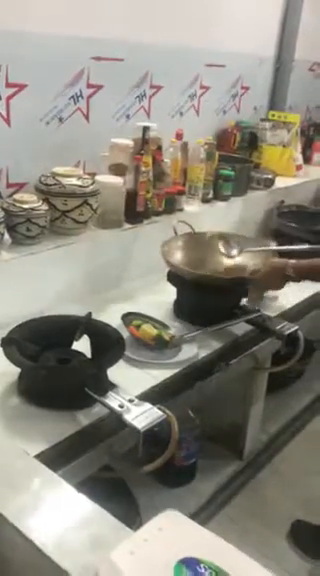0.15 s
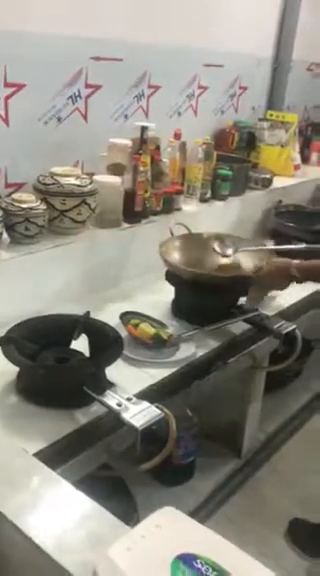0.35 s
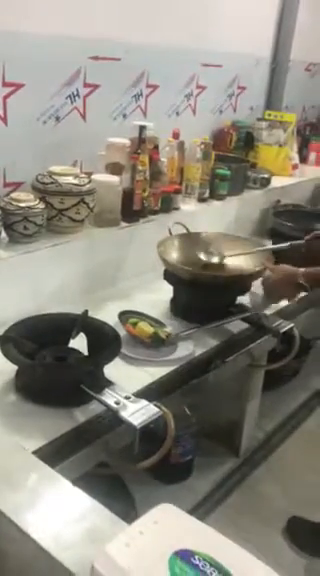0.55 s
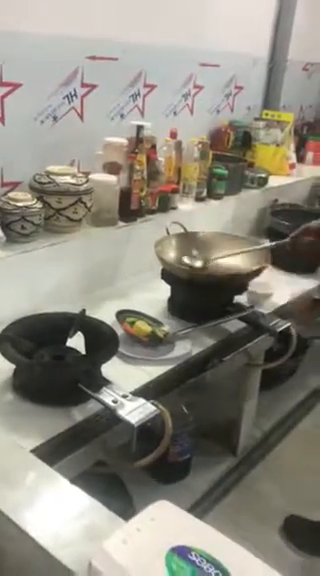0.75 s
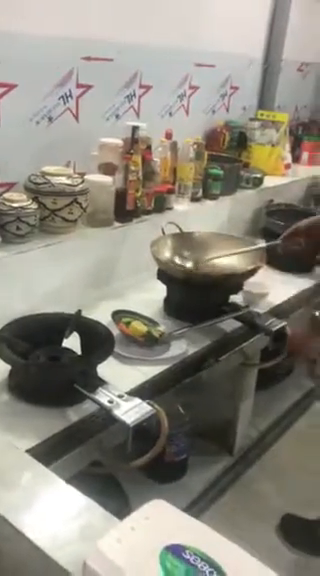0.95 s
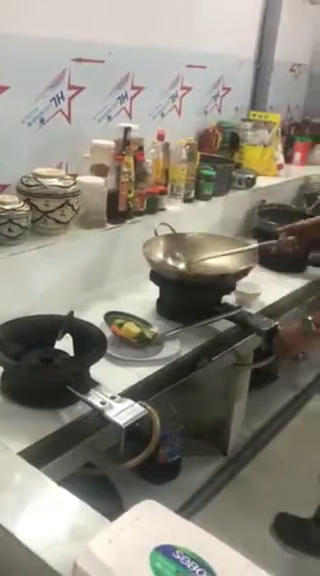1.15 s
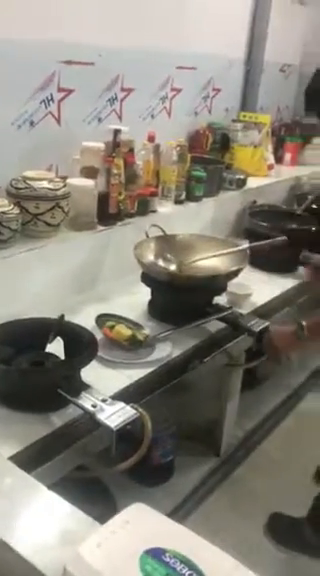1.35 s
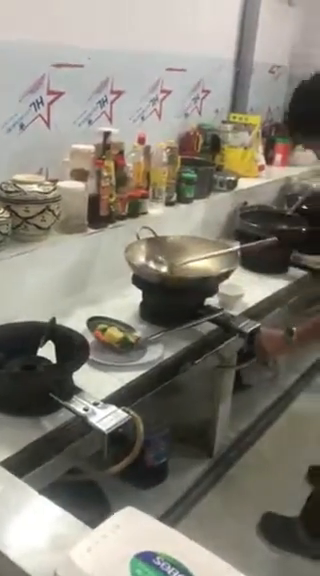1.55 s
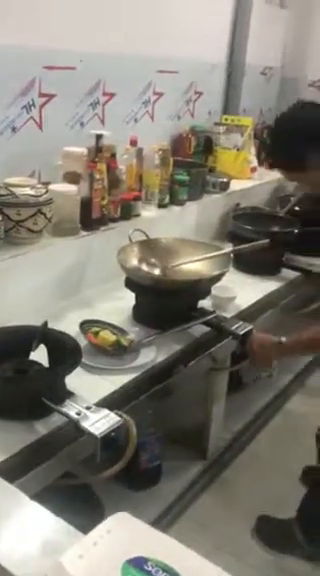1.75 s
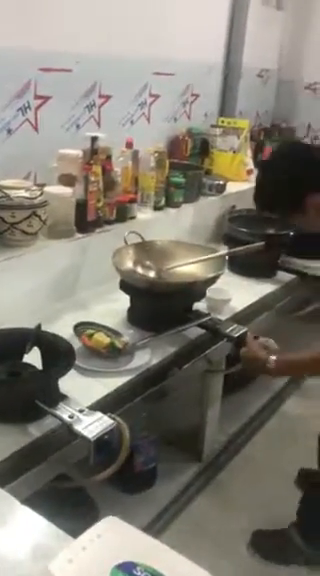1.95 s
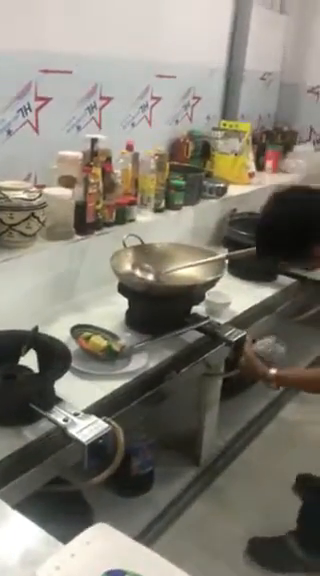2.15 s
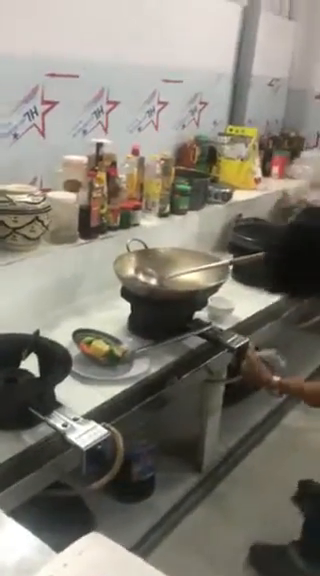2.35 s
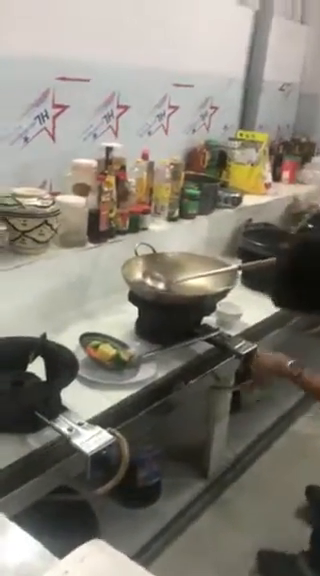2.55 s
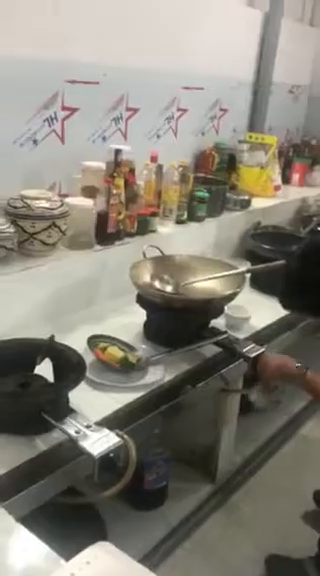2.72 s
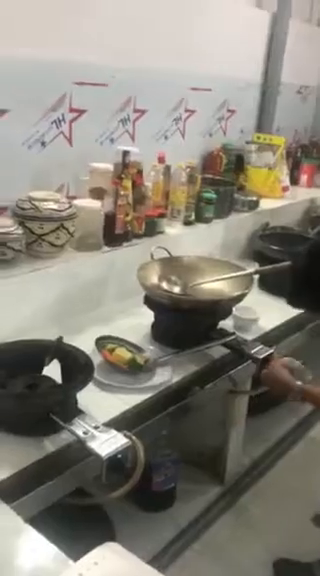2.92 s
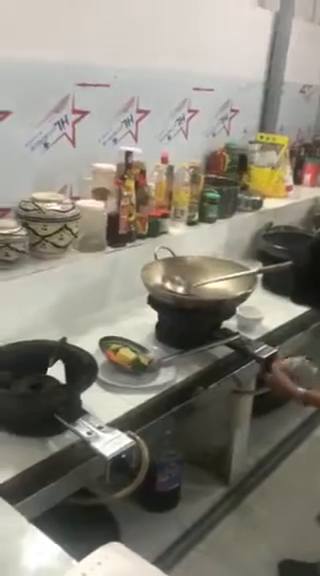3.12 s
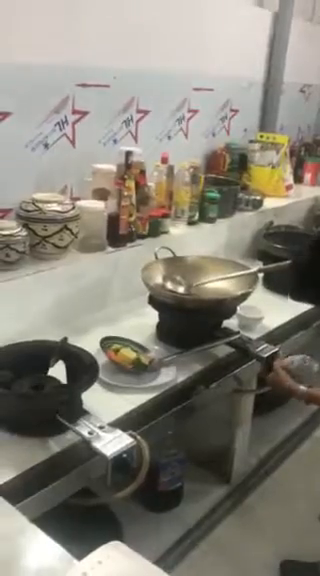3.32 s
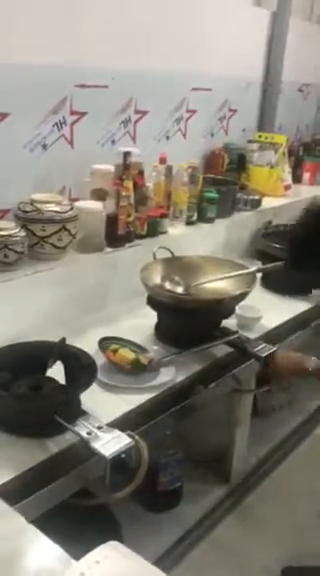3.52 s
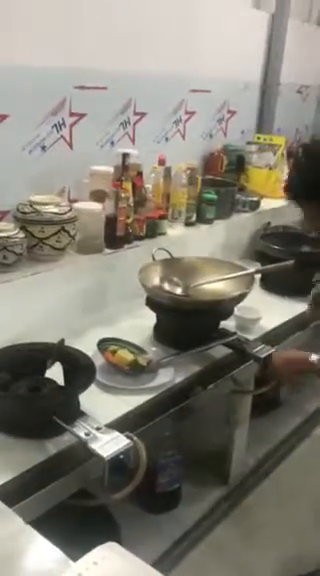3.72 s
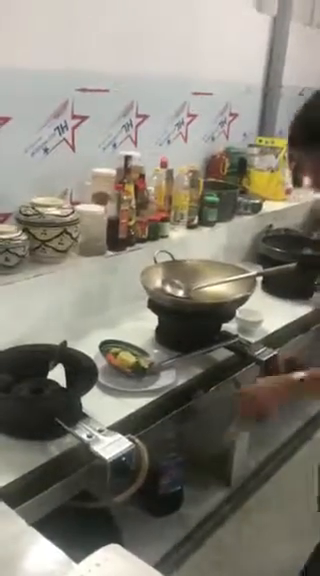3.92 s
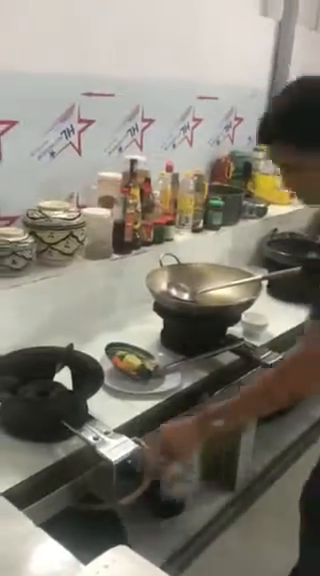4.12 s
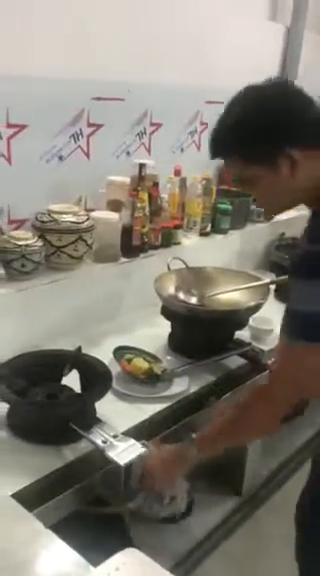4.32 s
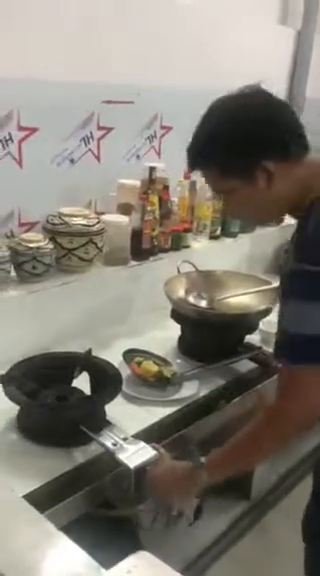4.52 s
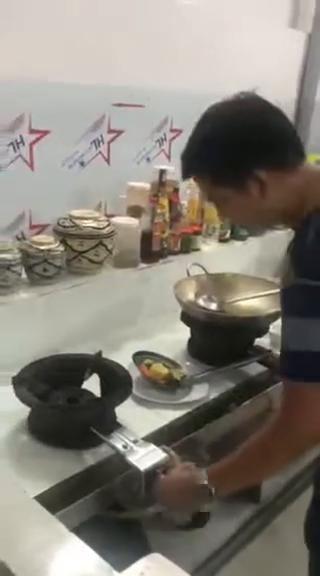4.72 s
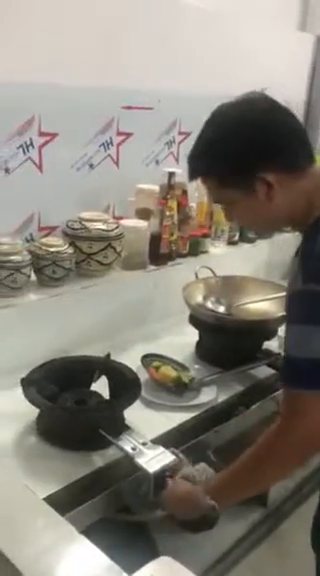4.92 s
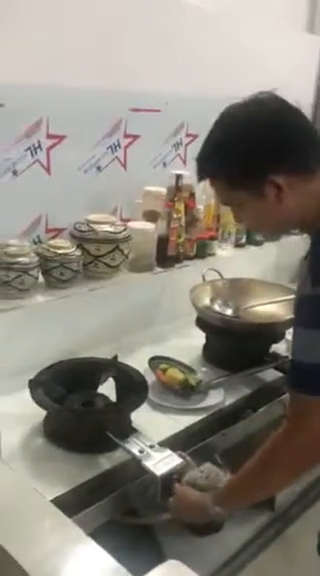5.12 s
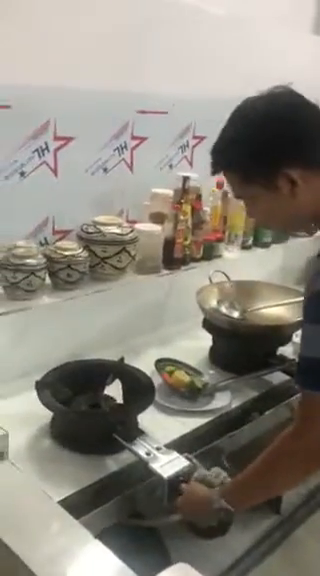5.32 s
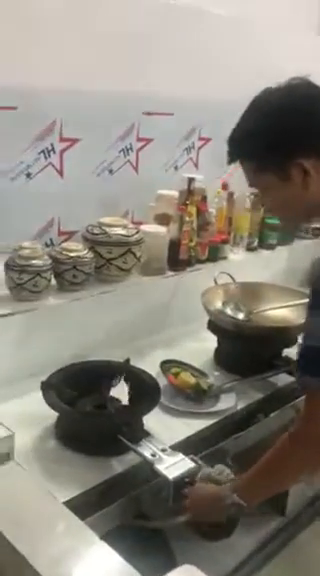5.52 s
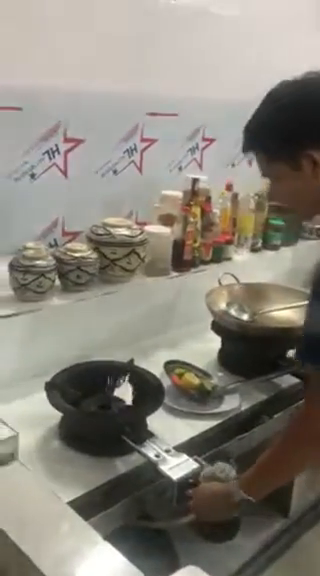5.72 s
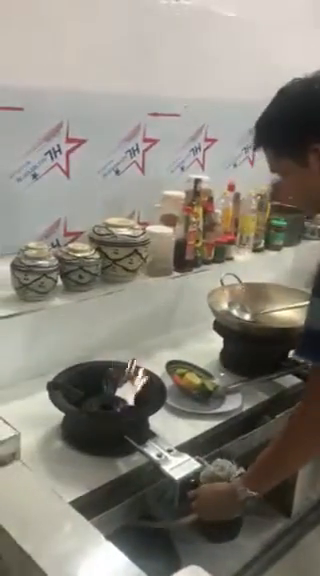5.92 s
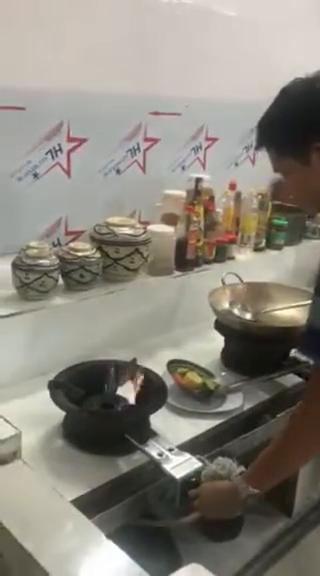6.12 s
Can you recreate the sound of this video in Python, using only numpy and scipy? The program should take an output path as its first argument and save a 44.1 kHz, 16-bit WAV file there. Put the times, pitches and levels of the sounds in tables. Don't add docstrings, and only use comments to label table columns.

```python
import sys
import numpy as np
from scipy import signal
from scipy.fft import rfft, irfft
from scipy.io import wavfile
from scipy.ndimage import uniform_filter1d

SR = 44100
rng = np.random.default_rng(int(sys.argv[2]) if len(sys.argv) > 2 else 0)


def transcribe(signal):
    frames = np.atleast_2d(signal).T
    limited = np.clip(frames, -1, 1)
    pcm = np.round(limited * 32767).astype(np.int16)
    wavfile.write(sys.argv[1], SR, pcm)


def decibels_to_gain(level_db):
    exponent = np.asarray(level_db, float) / 20
    return 10 ** exponent


N = 271656

# f/Hz, level per Hz/dB
FAN_AIR = [(18, -33.5), (30, -1.5), (101, -4), (167, -7.5), (245, -5.5), (376, -14), (404, -16),
           (445, -15.5), (501, -16.5), (1300, -19), (1470, -21.5), (9000, -23.5), (11700, -53),
           (19800, -120)]
# f/Hz, width/Hz, level/dB
MOTOR_HUM = [(49, 5.2, -59.5), (99, 16, -60), (312, 21.4, -63)]

# f/Hz, level/dB, t60/s (time to fade by 60 dB)
WOK_TONES = [(390, -6, 0.48), (460, -10, 0.4), (546, -9, 0.28), (643, -8, 0.21), (767, -18, 0.51),
             (1602, -11, 0.18), (1774, 0, 0.15), (1943, -11, 0.24), (2051, -21, 0.55), (2116, -11, 0.33),
             (2449, -22, 0.44), (2627, -21, 0.55), (2885, -20, 0.45), (3066, -11, 0.25), (3168, -19, 0.29),
             (3529, -12, 0.15), (3682, -8, 0.35), (3844, -17, 0.21), (3970, -14, 0.16), (4253, -21, 0.32),
             (4582, -14, 0.25), (5297, -23, 0.27), (5491, -21, 0.19), (5693, -30, 0.55), (5905, -21, 0.25),
             (6565, -26, 0.29), (7757, -22, 0.15), (8425, -25, 0.2), (8619, -24, 0.19), (8923, -27, 0.23)]
LADLE_TONES = [(848, -18, 0.4), (1109, -7, 0.32), (1252, 0, 0.17), (1591, -11, 0.31), (2164, -12, 0.36),
               (2662, -20, 0.4), (2894, -13, 0.32), (3050, -12, 0.4), (3370, -2, 0.2), (3467, -14, 0.36),
               (3709, -9, 0.24), (4116, -8, 0.21), (4204, -13, 0.33), (4533, -19, 0.4), (4788, -15, 0.3),
               (5286, -15, 0.28), (7938, -13, 0.17), (8966, -24, 0.39)]
BASE_TONES = [(390, 0, 0.36), (600, -9, 0.3), (939, -19, 0.45), (1209, -16, 0.45), (1346, -1, 0.15),
              (2113, -12, 0.2), (2885, -23, 0.45), (3634, -17, 0.25), (4366, -24, 0.42), (5556, -24, 0.36),
              (6498, -24, 0.38), (6837, -23, 0.26)]
FAR_TONES = [(388, -10, 0.33), (1314, -10, 0.21), (1631, -13, 0.4), (1914, -11, 0.22), (2667, -7, 0.27),
             (2950, -5, 0.35), (3033, 0, 0.31), (3092, -6, 0.4), (3222, -11, 0.43), (3410, -4, 0.26),
             (3502, -6, 0.32), (3784, -3, 0.33), (4581, -9, 0.3), (5036, -11, 0.29), (5364, -12, 0.24),
             (5472, -13, 0.38), (5582, -9, 0.24), (5744, -11, 0.21), (6188, -10, 0.26), (6492, -10, 0.23),
             (6823, -12, 0.28), (7267, -14, 0.18), (7701, -6, 0.19), (8000, -14, 0.44), (8175, -8, 0.23),
             (8398, -4, 0.2), (8481, -7, 0.26), (8788, 0, 0.18), (8955, -15, 0.29), (9222, -15, 0.5)]
KNOB_TONES = [(1319, -18, 0.3), (3402, -15, 0.3), (3782, -14, 0.3), (3914, 0, 0.16), (3984, -6, 0.21),
              (4218, -14, 0.28), (4592, -20, 0.3), (4996, -22, 0.3), (6218, -17, 0.3), (6514, -19, 0.3),
              (6737, -19, 0.3), (7036, -16, 0.3), (7943, -20, 0.3), (8409, -20, 0.3), (8576, -15, 0.25),
              (8694, -13, 0.3), (9041, -26, 0.3)]
NEAR_TONES = [(1222, -19, 0.24), (1378, -13, 0.18), (1572, -16, 0.23), (2826, -9, 0.31), (2966, -5, 0.24),
              (3060, -8, 0.45), (3101, -14, 0.3), (3187, -16, 0.45), (3464, -14, 0.35), (3997, -9, 0.17),
              (4083, -20, 0.44), (4196, -21, 0.45), (4312, -15, 0.25), (4385, -15, 0.22), (4762, -10, 0.21),
              (4869, -13, 0.21), (5157, -19, 0.38), (5515, -5, 0.15), (5994, -20, 0.41), (6317, -14, 0.24),
              (6425, -22, 0.38), (6683, -24, 0.36), (7249, -19, 0.23), (7965, -19, 0.25), (8371, -12, 0.23),
              (8759, -15, 0.38), (9079, -11, 0.23), (9238, -10, 0.15)]

# f/Hz, level per Hz/dB
WOK_CRACK = [(59, -35), (100, -9.5), (491, 2.5), (1380, -11.5), (2110, -2.5), (2370, -8.5), (3680, -0.5),
             (5100, -12.5), (5840, -9), (8570, -19.5), (9800, -42.5), (12700, -82), (21600, -120)]
LADLE_CRACK = [(180, -32), (300, -5), (950, -9), (1120, -2.5), (1430, -18.5), (2520, -11), (3010, -7.5),
               (8850, -17.5), (9800, -58), (12700, -89), (21600, -120)]
BASE_CRACK = [(59, -30), (100, -7), (383, 1), (809, -11.5), (1360, -13), (1920, -29.5), (2110, -19.5),
              (6300, -28), (8900, -40), (9800, -83.5), (12700, -110), (21600, -120)]
FAR_CRACK = [(120, -53), (200, -24), (1070, -21.5), (1610, -20), (2540, -23), (3030, 1), (4200, -8.5),
             (4630, -8), (4870, -8.5), (7190, -13.5), (8330, -6), (9800, -9.5), (12700, -36), (21600, -120)]
KNOB_CRACK = [(290, -51), (500, -25.5), (833, -23.5), (2150, -22), (3570, -4.5), (3900, -6.5), (5190, -7.5),
              (8870, -4), (9800, -30.5), (12700, -64), (21600, -120)]
NEAR_CRACK = [(120, -44), (200, -16), (939, -25.5), (1220, -17.5), (1390, -24), (1560, -6.5), (2420, -15.5),
              (3130, -1.5), (5540, -12.5), (8890, -3.5), (9800, -1), (12700, -39), (21600, -120)]

# f/Hz, level per Hz/dB
WOK_WASH = [(88, -49), (150, -23), (216, -21), (402, -1.5), (956, -23), (2050, -17.5), (3330, -18.5),
            (3760, -16), (4090, -23.5), (9400, -33.5), (12200, -60.5), (20700, -120)]
FAR_WASH = [(290, -42.5), (500, -15), (723, -15.5), (901, -36), (1620, -12.5), (1770, -31), (1880, -25.5),
            (3000, -5), (7350, -23), (9400, -8.5), (12200, -35), (20700, -120)]
NEAR_WASH = [(290, -59), (500, -32), (565, -10), (1030, -31.5), (1180, -12.5), (2180, -25.5), (2930, -1),
             (7540, -16), (8110, -11.5), (9400, -12.5), (12200, -38), (20700, -120)]

# t/s, peak level/dB, brightness/dB per octave, ring against crack/dB, crack t60/s, rattle/s
WOK_BLOWS = [
    (0.001, -32.5, 0.3, -7.5, 0.06, 0.015),
    (0.743, -8, 1.13, -6, 0.091, 0.01),
]
LADLE_BLOWS = [
    (0.164, -29, -0.3, -4, 0.1, 0.011),
    (0.189, -36, -0.3, -7, 0.13, 0.01),
    (0.539, -31.5, -0.33, -7.5, 0.077, 0.0079),
    (0.612, -37, -0.3, -6, 0.16, 0.011),
    (0.65, -34, -0.26, -7, 0.13, 0.016),
    (1.006, -29, -0.3, -1.5, 0.13, 0.0092),
    (1.034, -36, -0.3, -1, 0.1, 0.015),
    (1.219, -44.5, -0.3, -4, 0.085, 0.0079),
    (1.292, -44, -0.3, -4, 0.063, 0.012),
]
LADLE_SCRAPE = [
    (6.12, -26.5, 0.67, -8, 0.1, 0.05),
]
BASE_BLOWS = [
    (0.307, -21, 0.24, -4.5, 0.12, 0.0064),
    (0.328, -22.5, 0.43, -6, 0.1, 0.0047),
    (0.54, -36.5, 0.45, -8, 0.17, 0.006),
    (0.575, -27.5, 0.23, -11, 0.077, 0.0052),
    (0.599, -34, 0.3, -10, 0.12, 0.0052),
    (0.766, -19, 0.44, -1, 0.095, 0.0057),
]
FAR_SNAPS = [
    (2.1994, -8.5, 0.19, -6.5, 0.049, 0.014),
    (3.2853, -8.5, 0.077, -7.5, 0.074, 0.011),
]
KNOB_CLICKS = [(2.6385, -43, 0.13, -7, 0.043, 0.007), (2.6913, -21.5, 0.1, -8, 0.071, 0.0062),
               (2.967, -39, 0.14, -9.5, 0.06, 0.007), (2.9886, -40.5, 0.1, -9, 0.06, 0.0082),
               (3.5109, -35, 0.1, -8, 0.06, 0.005), (3.605, -38.5, 0.11, -7, 0.074, 0.008),
               (3.6317, -20, 0.11, -7, 0.054, 0.0061), (3.9421, -40.5, 0.1, -9, 0.067, 0.008),
               (4.5572, -42, 0.1, -7.5, 0.06, 0.007), (4.783, -47, 0.1, -8, 0.082, 0.0099),
               (4.807, -36.5, 0.1, -10, 0.055, 0.0049), (5.7614, -43, 0.1, -2.5, 0.067, 0.0059)]
NEAR_SNAPS = [
    (5.1405, -10.5, -0.12, -6, 0.059, 0.015),
]

# t/s, peak level/dB, f/Hz, t60/s
THUDS = [
    (1.4, -42.5, 121, 0.25),
    (1.906, -33, 259, 0.16),
    (1.918, -33, 167, 0.27),
    (1.988, -38.5, 307, 0.31),
    (2.038, -43.5, 310, 0.39),
    (2.214, -43.5, 375, 0.29),
    (3.299, -35.5, 358, 0.2),
    (4.394, -34.5, 246, 0.25),
]
# t/s, level/dB, resonance f/Hz
CLOTH = [
    (4.25, -72, 834),
    (4.318, -54, 730),
    (4.372, -54, 790),
    (4.418, -43, 1030),
    (4.438, -49.5, 1010),
    (4.494, -51, 809),
    (4.598, -49, 940),
    (4.714, -69, 710),
    (4.72, -61, 740),
]
# t/s, roar level/dB, hiss level/dB
FLAME = [
    (5.3, -61, -58),
    (5.5, -53.5, -73),
    (5.698, -48, -62.5),
    (5.714, -53, -64),
    (5.794, -54, -57),
    (5.884, -64, -82),
    (6.012, -68, -69),
    (6.03, -59, -69),
    (6.104, -43.5, -55),
    (6.12, -36.5, -46),
]

# f/Hz, t60/s
ROOM_ECHO = [(200, 0.92), (700, 0.72), (2000, 0.54), (4500, 0.35), (8500, 0.37)]
# f/Hz, level/dB
MIC = [(32, -17), (45, -0.5), (4400, -0.5), (4950, -2), (5500, 0), (7000, -1), (7550, -3.5), (8300, 0),
       (9050, 0), (9500, -14), (10300, -31), (11000, -70)]
# f/Hz, step above neighbouring sound level/dB
PHONE_STEP = [(100, -17), (1500, -5), (3000, 1.5), (5000, 4), (9000, 5)]


def unit(x):
    return x / np.sqrt(np.mean(x ** 2))


def fade(t, t60):
    return np.exp(-np.log(1000) * t / t60)


def log_hz(count):
    return np.log2(np.maximum(np.fft.rfftfreq(count, 1 / SR), 1))


def colour(x, table, tilt_db=0.):
    hz, db = np.transpose(table)
    octave = log_hz(len(x))
    shape = np.interp(octave, np.log2(hz), db) + tilt_db * (octave - 11)
    return unit(irfft(rfft(x) * decibels_to_gain(shape), len(x)))


def band(x, hz, width):
    return signal.lfilter(*signal.iirpeak(hz, hz / width, fs=SR), x)


def walk(rate_hz):
    hold = int(SR / rate_hz)
    levels = np.repeat(rng.standard_normal(N // hold + 1), hold)
    smooth = uniform_filter1d(uniform_filter1d(levels, hold), hold)
    return unit(smooth[:N])


def curve(table):
    s, *columns = np.transpose(table)
    t = np.arange(N) / SR
    inside = 1. * ((t > s[0]) & (t < s[-1]))
    gate = uniform_filter1d(inside, 2000, mode="nearest")
    return gate, [np.interp(t, s, column) for column in columns]


def add(out, s, sound):
    i = int(s * SR)
    out[i:i + len(sound)] += sound[:N - i]


def fans():
    spectrum = rfft(colour(rng.standard_normal(N), FAN_AIR))
    octave = log_hz(N) - np.log2(20)
    swell = walk(1.28)
    air = np.zeros(N)
    for k in range(11):
        share = np.clip(1 - abs(octave - k), 0, 1)
        flicker = 0.37 * walk(6)
        air += irfft(spectrum * share, N) * decibels_to_gain(0.23 * swell + flicker)
    hum = sum(decibels_to_gain(db) * unit(band(rng.standard_normal(N), hz, width)) for hz, width, db in MOTOR_HUM)
    return decibels_to_gain(-50) * unit(air) + hum


def strikes(blows, tones, crack, wash, wash_db, wash_t60):
    scatter_db, twin_db, rise_s = 0.7, -9, 0.00043
    out = np.zeros((2, N))
    t = np.arange(SR * 3 // 4) / SR
    hz, db, t60 = (column[:, None] for column in np.transpose(tones))
    for s, peak_db, tilt_db, ring_db, crack_t60, rattle_s in blows:
        scatter, phase, split, twin_phase = rng.standard_normal((4, len(tones), 1))
        size = decibels_to_gain(db + scatter_db * scatter + tilt_db * np.log2(hz / 2048))
        main = np.sin(2 * np.pi * (hz * t + phase))
        twin = np.sin(2 * np.pi * ((hz + 22 * split) * t + twin_phase))
        pair = main + decibels_to_gain(twin_db) * twin
        ring = (size * fade(t, t60) * pair).sum(0) / np.sqrt((size ** 2).sum())
        noise = rng.standard_normal((2, len(t)))
        hiss = colour(noise[0], crack, tilt_db) * fade(np.maximum(t - rattle_s, 0), crack_t60)
        hiss += decibels_to_gain(wash_db) * colour(noise[1], wash, tilt_db) * fade(t, wash_t60)
        blow = decibels_to_gain(peak_db - 10) * (1 - np.exp(-t / rise_s))
        add(out[0], s, blow * hiss)
        add(out[1], s, blow * decibels_to_gain(ring_db + 2.5) * ring)
    return out


def wok():
    return strikes(WOK_BLOWS, WOK_TONES, WOK_CRACK, WOK_WASH, wash_db=-11.5, wash_t60=0.55)


def ladle():
    return strikes(LADLE_BLOWS + LADLE_SCRAPE, LADLE_TONES, LADLE_CRACK, LADLE_CRACK,
                   wash_db=-14.5, wash_t60=0.28)


def wok_base():
    return strikes(BASE_BLOWS, BASE_TONES, BASE_CRACK, BASE_CRACK, wash_db=-13, wash_t60=0.54)


def thuds():
    out = np.zeros(N)
    t = np.arange(SR // 2) / SR
    for s, peak_db, hz, t60 in THUDS:
        panel = unit(band(rng.standard_normal(len(t)), hz, hz / 3))
        soft_start = 1 - np.exp(-t / 0.0053)
        add(out, s, decibels_to_gain(peak_db - 7) * panel * fade(t, t60) * soft_start)
    return out


def far_igniter():
    return strikes(FAR_SNAPS, FAR_TONES, FAR_CRACK, FAR_WASH, wash_db=-11, wash_t60=.42)


def knobs():
    return strikes(KNOB_CLICKS, KNOB_TONES, KNOB_CRACK, KNOB_CRACK, wash_db=-17, wash_t60=.25)


def cloth():
    gate, (db, hz) = curve(CLOTH)
    grains = rng.standard_normal(N) * decibels_to_gain(2.2 * walk(83))
    high = np.clip((hz - 650) / 400, .15, .9)
    ledge = (1 - high) * unit(band(grains, 710, 120)) + high * unit(band(grains, 986, 180))
    rustle = decibels_to_gain(-28) * unit(band(grains, 1500, 1600))
    return gate * decibels_to_gain(db) * (ledge + rustle)


def near_igniter():
    return strikes(NEAR_SNAPS, NEAR_TONES, NEAR_CRACK, NEAR_WASH, wash_db=-10, wash_t60=0.34)


def flame():
    gate, (roar_db, hiss_db) = curve(FLAME)
    roar = unit(band(rng.standard_normal(N), 173, 270)) * decibels_to_gain(roar_db + 2.4 * walk(37))
    hiss = unit(band(rng.standard_normal(N), 2300, 2500)) * decibels_to_gain(hiss_db + 2.0 * walk(29))
    return gate * (roar + hiss)


def room(x):
    t = np.arange(SR) / SR
    tail = np.zeros(SR)
    for hz, t60 in ROOM_ECHO:
        tail += unit(band(rng.standard_normal(SR), hz, hz)) * np.sqrt(hz) * fade(t, t60)
    tail *= np.clip((t - .004) / 0.022, 0, 1)
    tail /= np.sqrt((tail ** 2).sum())
    return x + decibels_to_gain(-10.5) * signal.fftconvolve(x, tail)[:N]


def scene():
    hits = wok() + ladle() + wok_base() + far_igniter() + knobs() + near_igniter()
    echoing = room(hits[0] + thuds() + cloth())
    return (echoing + hits[1] + flame() + fans())[None]


def phone_thinning(x):
    size, attack_db = 1024, 9
    k = np.arange(size)[:, None] + .5
    n = np.arange(2 * size) + .5
    window = np.sqrt(2 / size) * np.sin(np.pi * n / (2 * size))
    basis = window * np.cos(np.pi / size * (n + size / 2) * k)
    blocks = np.pad(x, (size, 2 * size - len(x) % size)).reshape(-1, size)
    frames = np.hstack([blocks[:-1], blocks[1:]])
    lines = frames @ basis.T
    nearby = uniform_filter1d(uniform_filter1d(lines ** 2, size=96, axis=1), size=2, axis=0)
    hz, db = np.transpose(PHONE_STEP)
    step = np.sqrt(nearby + 1e-14) * decibels_to_gain(np.interp(k[:, 0] * SR / (2 * size), hz, db))
    step = np.repeat(step[:, ::16], 16, axis=1)
    change = np.diff(frames, axis=1, prepend=0.).reshape(len(frames), 8, -1)
    power = (change ** 2).sum(2) + 1e-12
    sudden = (power[:, 1:] / power[:, :-1]).max(1) > decibels_to_gain(2 * attack_db)
    step[sudden] *= .05
    rounded = np.sign(lines) * np.floor(abs(lines) / step + 0.35) * step
    back = rounded @ basis
    return (back[1:, :size] + back[:-1, size:]).ravel()[:len(x)]


def roll_off(x):
    return signal.sosfilt(signal.butter(12, 10620, fs=SR, output="sos"), x)


def record(dry):
    heard = colour(dry[0], MIC) * np.sqrt(np.mean(dry ** 2))
    mix = phone_thinning(heard)[None]
    return roll_off(mix)


dry = scene()
out = record(dry)
transcribe(out)
```